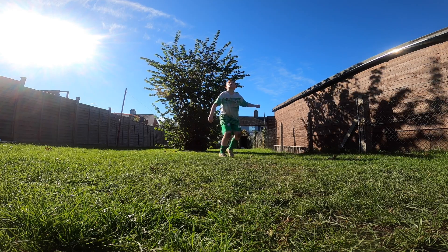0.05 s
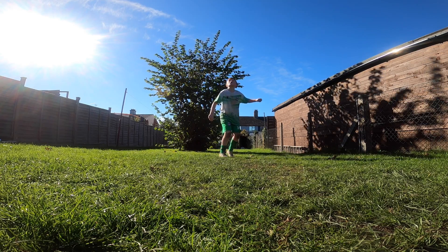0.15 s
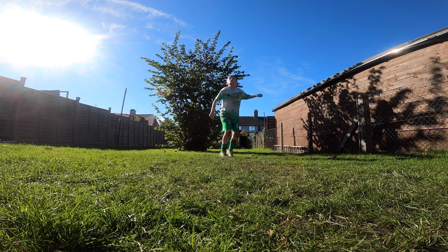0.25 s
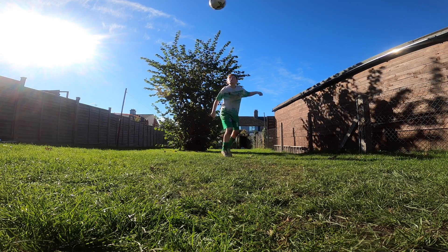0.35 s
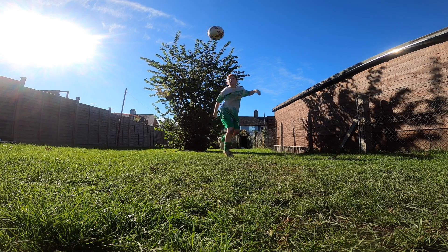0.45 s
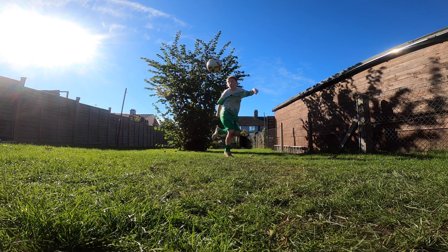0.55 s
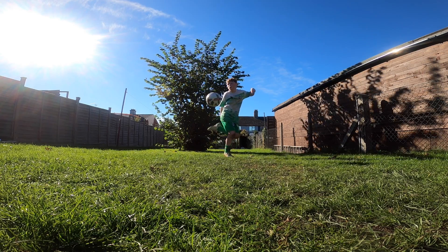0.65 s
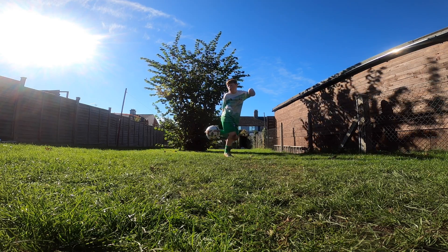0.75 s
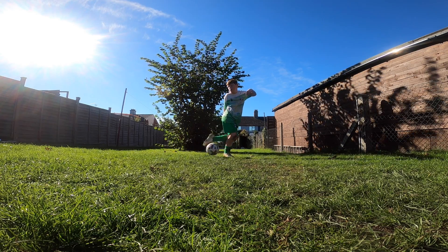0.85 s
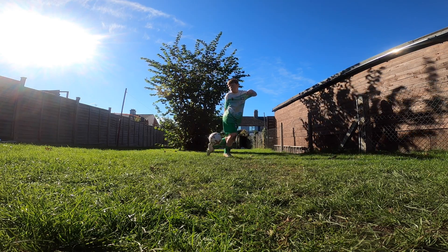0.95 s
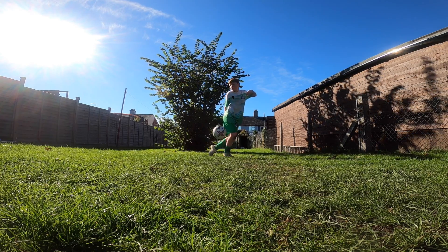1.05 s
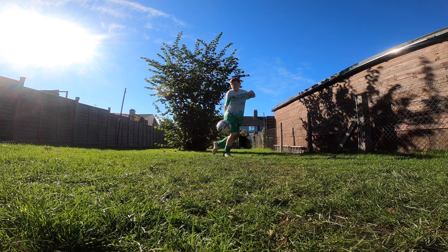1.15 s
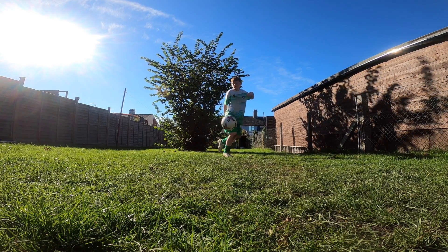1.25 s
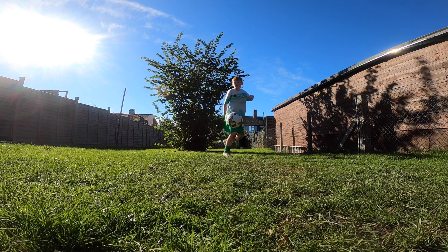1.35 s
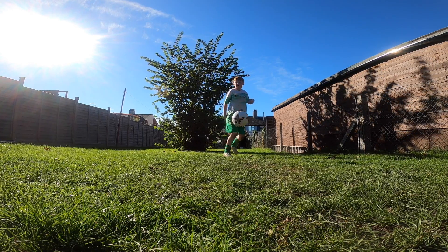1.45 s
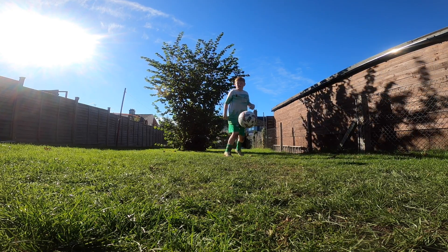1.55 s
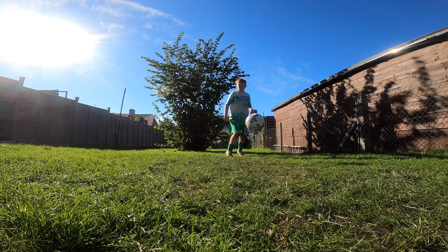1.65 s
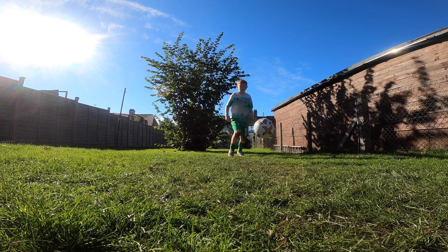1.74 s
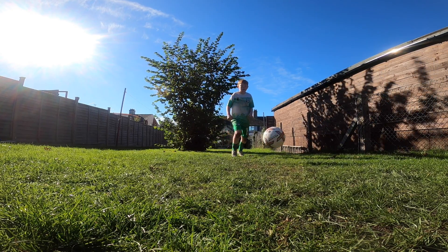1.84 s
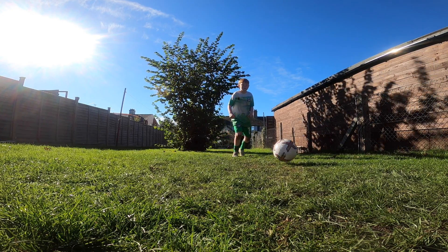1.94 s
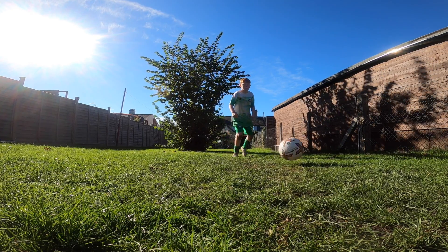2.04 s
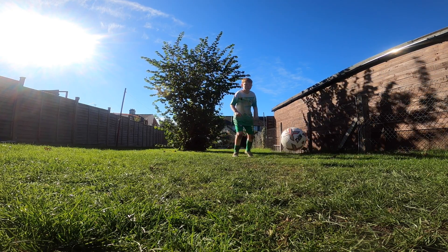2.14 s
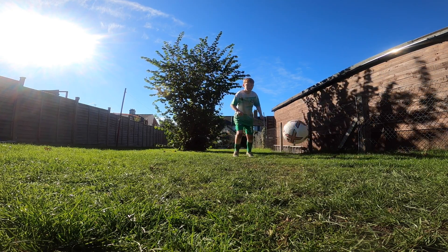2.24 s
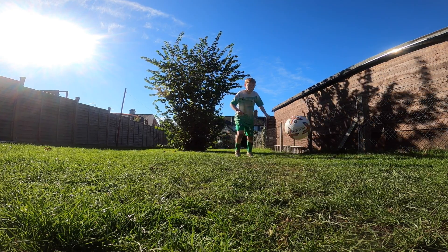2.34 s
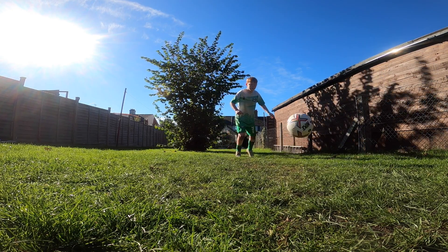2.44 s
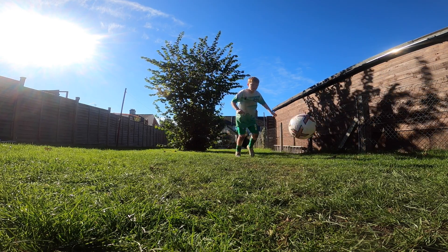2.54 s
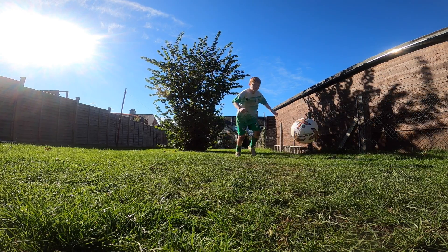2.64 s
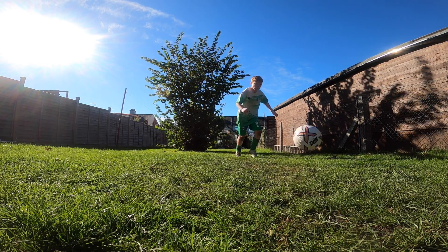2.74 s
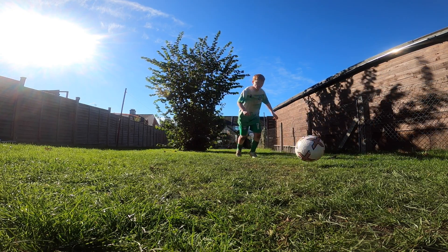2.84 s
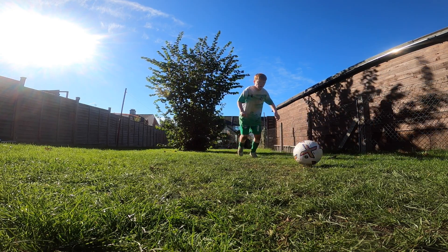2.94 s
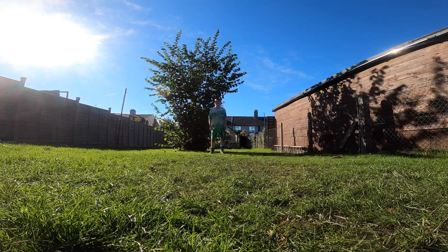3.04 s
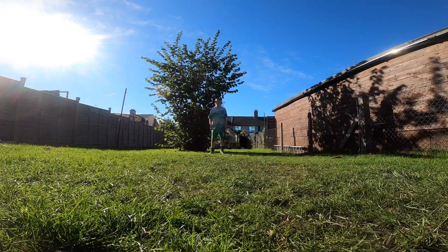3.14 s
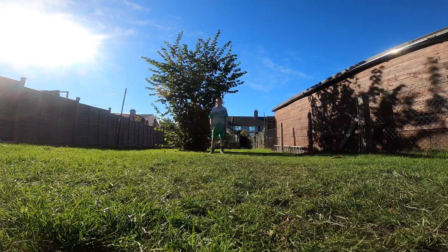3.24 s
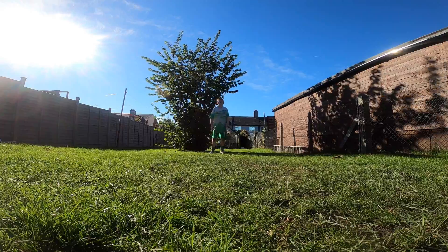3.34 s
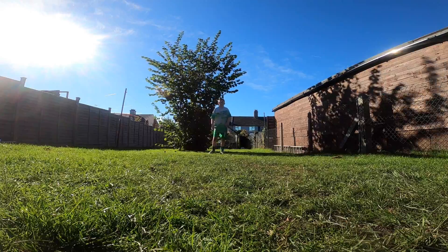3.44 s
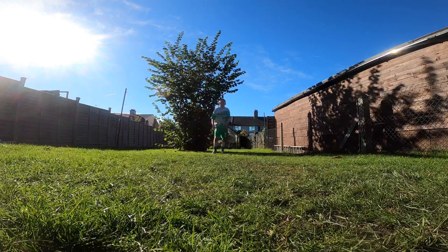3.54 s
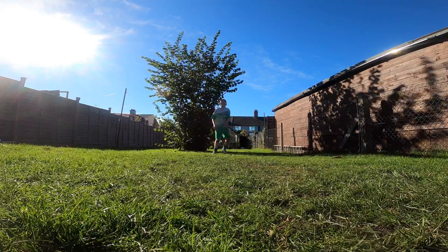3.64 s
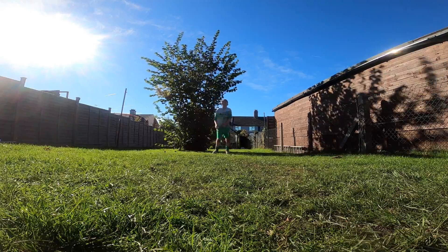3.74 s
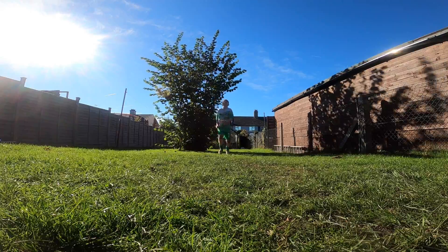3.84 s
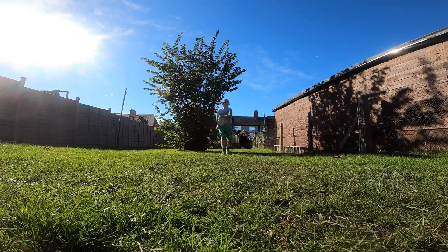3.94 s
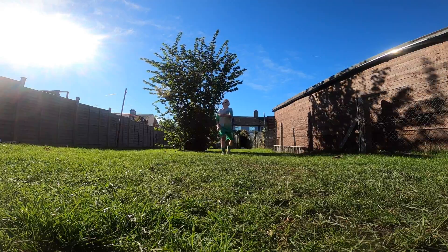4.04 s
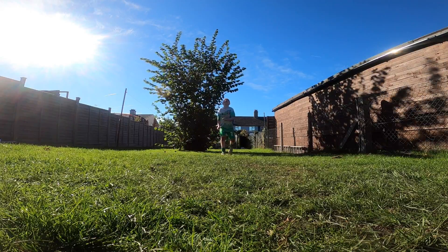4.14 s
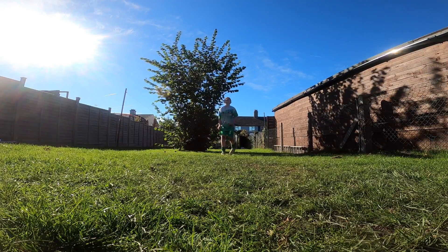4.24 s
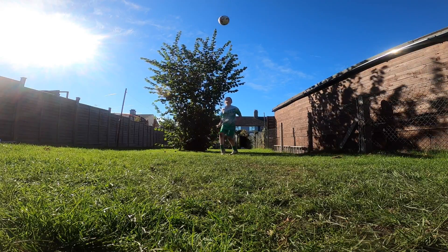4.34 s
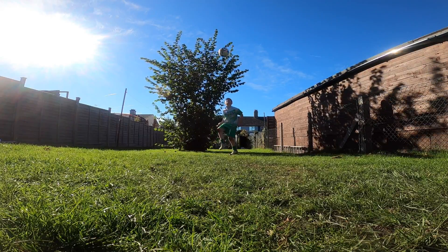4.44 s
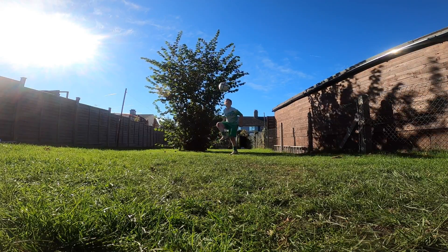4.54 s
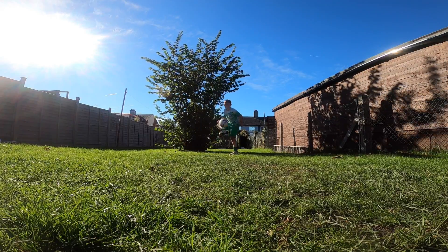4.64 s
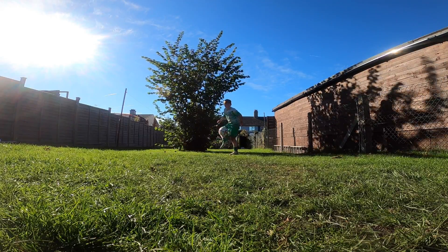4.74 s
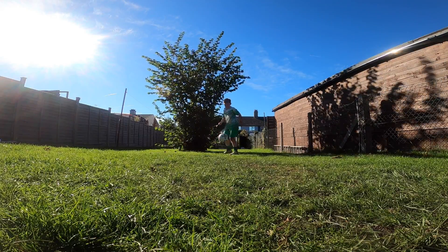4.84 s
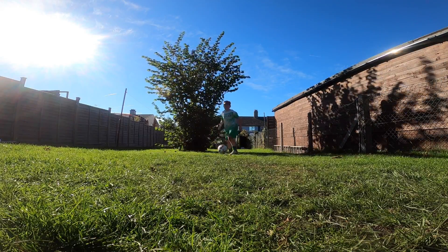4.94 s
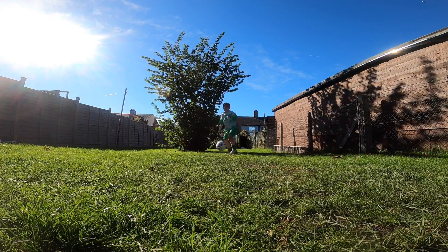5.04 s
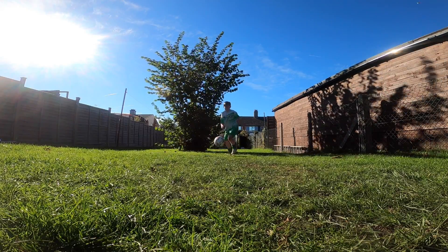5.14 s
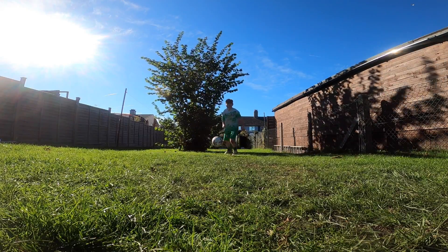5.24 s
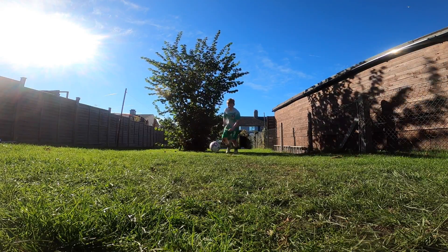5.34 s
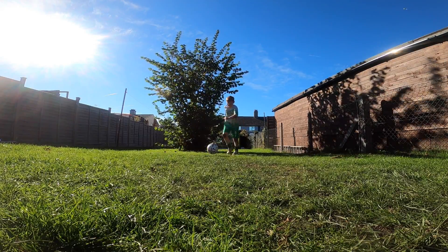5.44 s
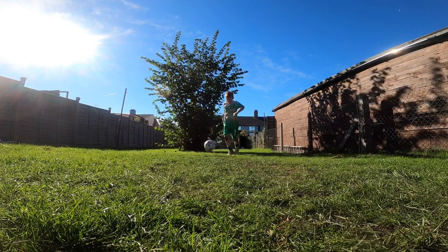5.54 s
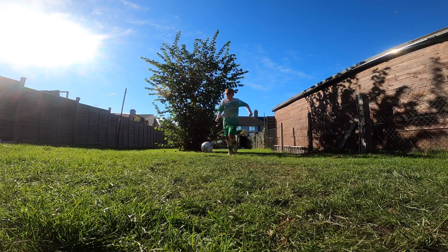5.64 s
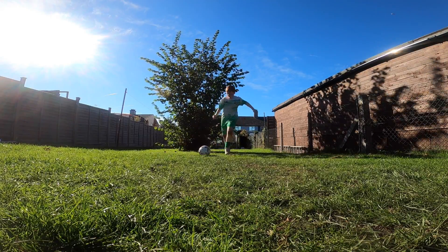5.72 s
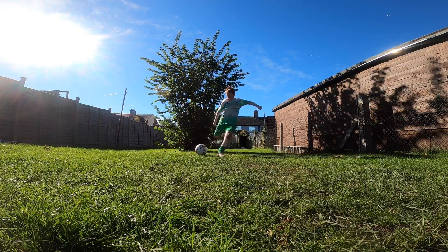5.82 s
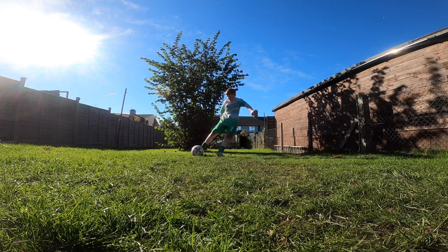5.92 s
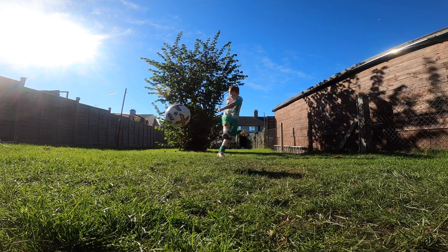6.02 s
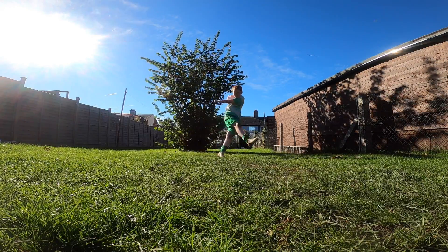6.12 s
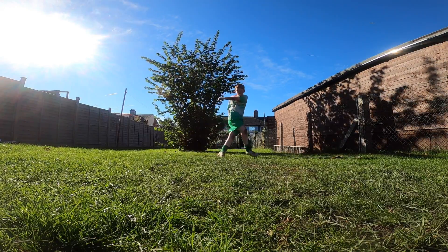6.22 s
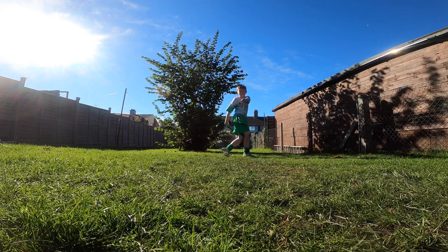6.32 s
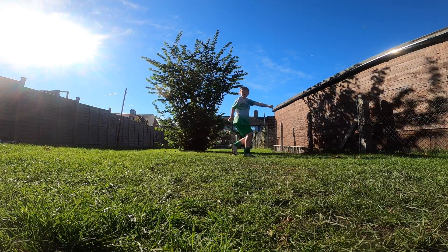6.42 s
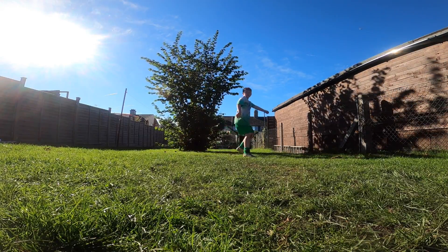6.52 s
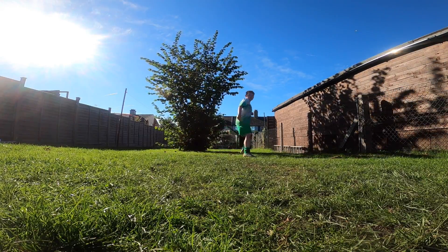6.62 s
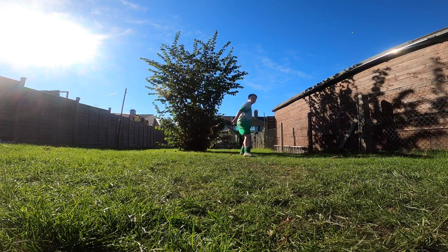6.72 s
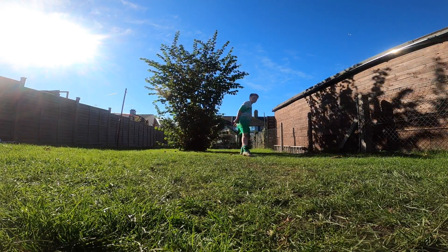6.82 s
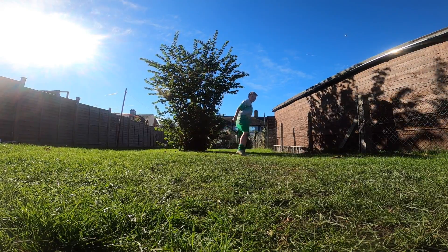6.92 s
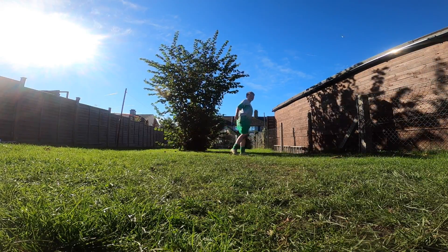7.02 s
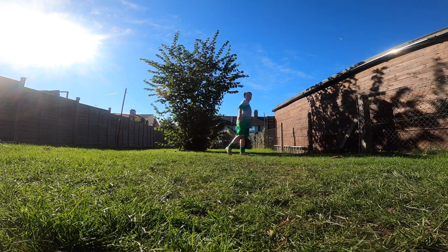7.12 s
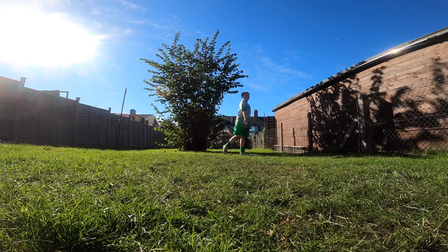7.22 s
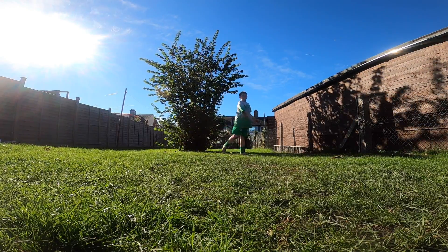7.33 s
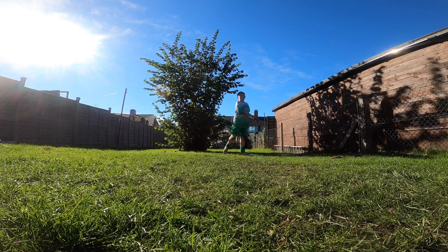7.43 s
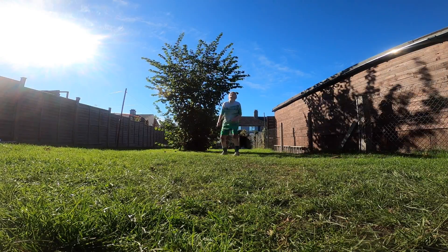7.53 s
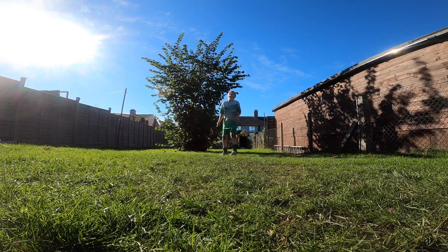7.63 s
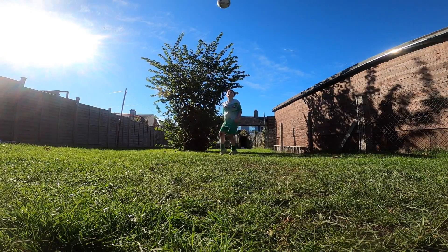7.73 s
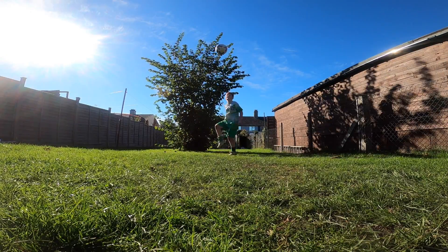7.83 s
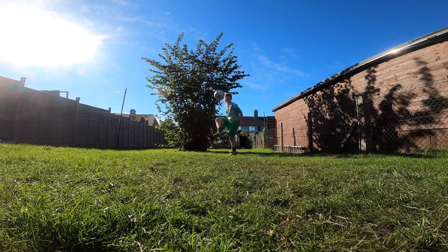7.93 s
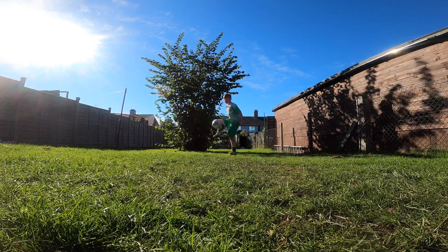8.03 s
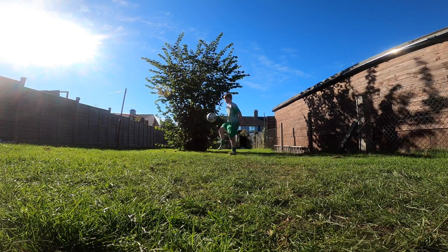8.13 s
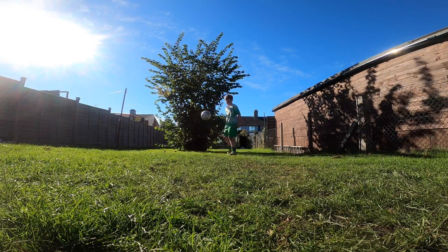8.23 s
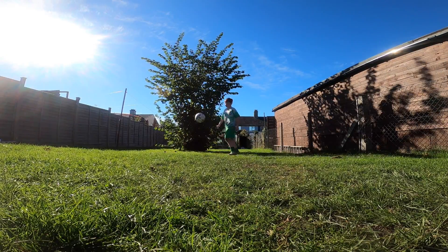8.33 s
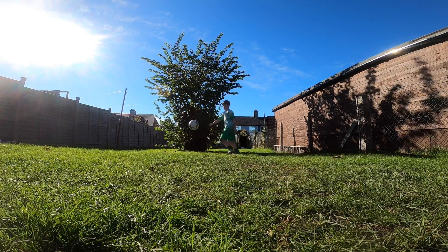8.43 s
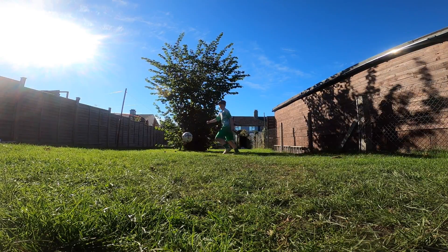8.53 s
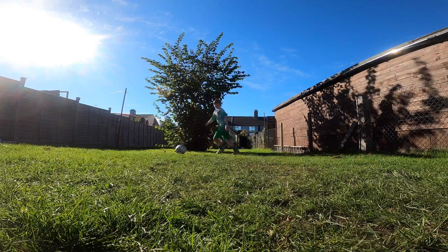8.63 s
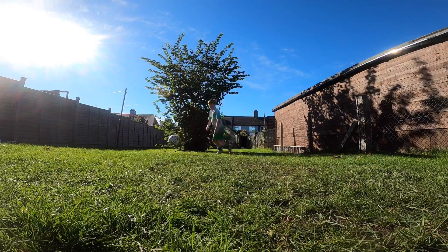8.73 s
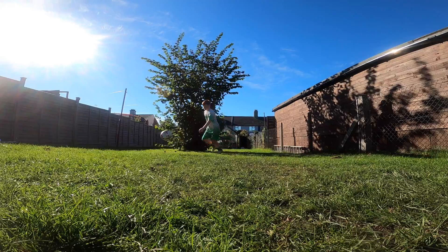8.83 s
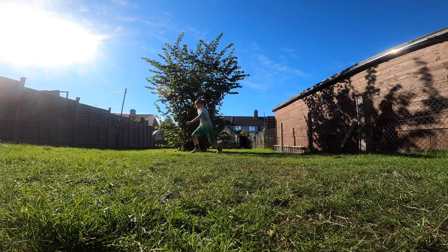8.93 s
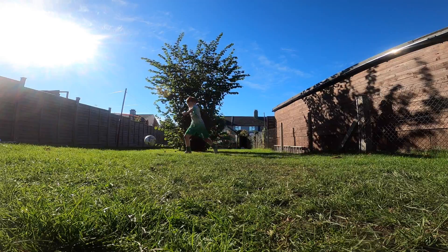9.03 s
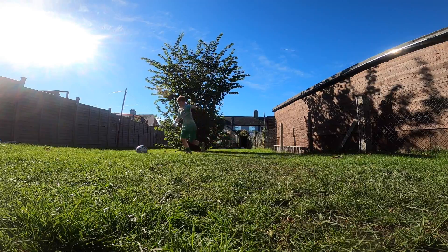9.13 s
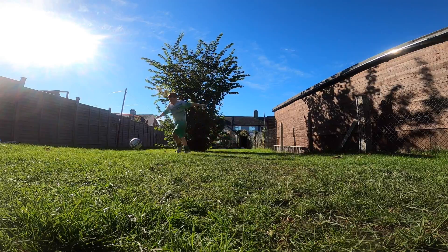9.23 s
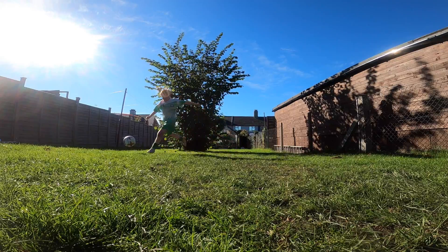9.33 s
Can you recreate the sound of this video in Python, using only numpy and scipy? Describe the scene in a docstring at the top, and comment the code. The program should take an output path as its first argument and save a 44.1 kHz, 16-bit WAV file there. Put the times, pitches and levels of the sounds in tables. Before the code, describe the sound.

A back garden with far traffic, light breeze and hissing leaves. Until about 3.1 s everything is in slow motion, low and stretched: a shoe scuff and strong booming double blow on a football at 1.0 s, then a duller thud with grass crunch at 2.2 s. The sound switches abruptly to normal speed, with uneven wind rumble and thin, faint bird notes around 3.2 to 4.3 s. Soft footfalls thump the turf near 3.6 s. A sharp, bright kick lands at 4.8 s, with a gust buffeting the microphone until 5.4 s. Steps lead to the loudest, hard smack at 6.05 s, with short garden echoes and faint chirps; at 6.6 s the ball hits the fence and a loose board rattles briefly. Quieter steps follow, another crisp slap at 8.1 s, then weaker, dull touches at 8.7 and 9.25 s, over subdued wind and leaves.

```python
"""A football is kicked and bounced on a back-garden lawn, with the first three seconds in slow motion.
It opens on far traffic, hissing leaves and a light breeze, all as shaped noise; then shoes scuff and thump
the grass, and each blow on the ball adds a slap, a low thud and garden echoes, made of dying sine waves.
At full speed the wind grows lumpy and a few far birds sing wavering notes; near five seconds a gust
thuds on the microphone, and after a later kick a struck fence board rattles."""
import sys
import numpy as np
from scipy import signal
from scipy.fft import rfft, irfft, next_fast_len
from scipy.io import wavfile

SR = 44100
rng = np.random.default_rng(int(sys.argv[2]) if len(sys.argv) > 2 else 0)


def inscribe(sig):
    """Save sig as 16-bit PCM at rate SR to the path in sys.argv[1].

    A 1-D sig is mono; a 2-D sig holds one channel per row.
    Samples are clipped to [-1, 1] before scaling.
    """
    pcm = np.round(np.clip(np.atleast_2d(sig).T, -1, 1) * 32767)
    wavfile.write(sys.argv[1], SR, pcm.astype(np.int16))


N = 413216
SLOW_UNTIL_S, SLOW_SPEED = 3.07, .5   # slow motion ends here; half speed
CUTOFF_HZ = 15500   # top of the shaped noises, before any slowing
TIME = np.arange(N) / SR   # seconds through the whole sound
AGE = np.arange(int(.6 * SR)) / SR   # seconds through one short sound
LEAD_S = .1   # a brush or lump peaks this far into its own sound, before any slowing


def from_db(db):
    """Turn decibels into a plain multiplier."""
    return 10 ** (np.asarray(db) / 20)


def rms_one(x):
    """Scale a sound to an average strength (rms) of 1."""
    return x / np.sqrt(np.mean(x ** 2) + 1e-20)


def in_time(rows):
    """Read each column of a curve at every sample."""
    s, *columns = np.transpose(rows)
    return [np.interp(TIME, s, column) for column in columns]


def at_hz(points, hz):
    """Read a curve over pitch, with straight lines on a log-frequency axis."""
    point_hz, values = np.transpose(points)
    return np.interp(np.log(hz + 1e-9), np.log(point_hz), values)


def band(x, low_hz, high_hz, order=2):
    """Keep only the pitches between two limits."""
    limits = [low_hz, min(high_hz, SR / 2 - 100)]
    return signal.sosfilt(signal.butter(order, limits, "band", fs=SR, output="sos"), x + 1e-18)


def stereo_noise(size, side_db):
    """White noise, partly unlike in the two ears."""
    mid, side = rng.standard_normal((2, size))
    return mid + from_db(side_db) * side * [[1], [-1]]


def coloured(spectrum, size, side_db, speed=1):
    """Stereo noise of a given spectrum, its middle at rms 1; a lower speed lowers its pitch."""
    padded = next_fast_len(size)
    hz = np.arange(padded // 2 + 1) * SR / padded / speed
    gain = from_db(at_hz(spectrum, hz)) * (hz < CUTOFF_HZ)
    noise = irfft(rfft(stereo_noise(padded, side_db)) * gain, padded)[:, :size]
    return noise / np.std(noise.mean(axis=0))


def drift(rate):
    """Random wander: lines between chance values of spread 1, rate of them per second."""
    knots = rng.standard_normal(int(rate * N / SR) + 2)
    return np.interp(TIME * rate, np.arange(len(knots)), knots)


def short_drift(rate):
    """The same wander, as long as one short sound."""
    return drift(rate)[:len(AGE)]


def pan(left_db):
    """Make the left louder than the right by left_db, shared between the two."""
    return from_db([[left_db / 2], [-left_db / 2]])


def ring(hz, t60):
    """One struck mode: a sine that falls by 60 dB in t60 seconds."""
    return np.sin(2 * np.pi * hz * AGE) * from_db(-60 * AGE / t60)


def delayed(sound, s):
    """The same sound, s seconds later."""
    return np.interp(AGE - s, AGE, sound, left=0)


def add(out, s, sound, lead=0):
    """Place a sound whose moment lies lead seconds in; slow motion stretches it and drops it an octave."""
    if s < SLOW_UNTIL_S:
        sound = signal.resample_poly(sound, round(1 / SLOW_SPEED), 1, axis=-1)
        lead = lead / SLOW_SPEED
    start = min(round((s - lead) * SR), N)
    out[:, start:start + sound.shape[-1]] += sound[..., :N - start]


def brush(length, hz):
    """Blades or leaves are stirred: grainy noise that swells quickly and settles more slowly."""
    grains = stereo_noise(len(AGE), side_db=-8) * from_db(4.8 * short_drift(900))
    sound = band(grains, hz * .6, hz * 1.3, order=3)
    sound = sound + from_db(-4) * band(grains, hz * .15, hz * 1.34)
    since = AGE - LEAD_S
    side_length = length * np.where(since < 0, .65, 1.2)
    return rms_one(sound) * np.exp(-np.abs(since / side_length) ** 0.79)


def lump(hz):
    """One smooth lump of pressure, with a shallow dip on either side."""
    phase = (np.pi * hz * (AGE - LEAD_S)) ** 2
    return (1 - 2 * phase) * np.exp(-phase)


# Colour of the wind before its speed shifts it. Each row: pitch in Hz, relative strength in dB.
WIND_COLOUR = [(15, 2), (35, 3.5), (65, 1.5), (120, -9.5), (200, -19.5), (320, -35), (700, -49),
               (2000, -84)]


def wind(level_db, speed, side_db, left_db):
    """Moving air makes low, lumpy noise on the microphone ports."""
    lumpy_db = level_db + 4.4 * drift(22 * speed)
    return from_db(lumpy_db) * coloured(WIND_COLOUR, N, side_db, speed) * pan(left_db)


# Colour of the traffic before its speed shifts it. Each row: pitch in Hz, relative strength in dB.
TRAFFIC_COLOUR = [(30, 17), (120, 17.5), (300, 8.5), (480, 2.5), (720, -3), (1050, 2), (1400, 2),
                  (1900, -8.5), (3000, -41), (9000, -51)]


def traffic(level_db, speed):
    """Far traffic is a dull, gently wandering noise."""
    wandering_db = level_db + 2.5 * drift(12 * speed)
    return from_db(wandering_db) * coloured(TRAFFIC_COLOUR, N, side_db=-9.5, speed=speed)


# Colour of the leaves before their speed shifts it. Each row: pitch in Hz, relative strength in dB.
LEAVES_COLOUR = [(600, -28), (2000, -4), (3100, 1), (5000, -3), (6800, -7), (8000, -13.5), (10000, -19.5),
                 (12000, -27.5), (16000, -41.5)]


def leaves(level_db, speed):
    """A bush hisses: bright noise that flutters a little."""
    fluttering_db = level_db + 1.87 * drift(40 * speed)
    return from_db(fluttering_db) * coloured(LEAVES_COLOUR, N, side_db=-3, speed=speed)


# Surroundings in slow motion. Each row: time in seconds, then traffic and leaves in dB before gain.
SLOW_AIR = [(0.0, -63, -66), (1.11, -62.5, -65), (1.38, -69, -70.5), (1.75, -65.5, -70.5),
            (2.42, -62, -62.5), (3.05, -65.5, -65)]


def slow_surroundings():
    """Traffic, leaves and a light, even breeze, slowed to half speed and so an octave lower."""
    traffic_db, leaves_db = in_time(SLOW_AIR)
    breeze = wind(-48.5, SLOW_SPEED, side_db=-12, left_db=-1.0)
    return breeze + traffic(traffic_db + 10.5, SLOW_SPEED) + leaves(leaves_db + 0.2, SLOW_SPEED)


# Shoes and ball touching the lawn; before 3.07 s slow motion doubles lengths and halves pitches.
# Each row: time in seconds, scuff in dB, scuff length in seconds, scuff centre in Hz,
# thump in dB before panning.
STEPS = [(0.997, -53, .002, 1390, -43), (1.020, -24.5, 0.0013, 3180, -35), (1.731, -61.5, 0.03, 2500, -49),
         (2.059, -53, 0.0055, 1800, -56), (2.179, -38, 0.0061, 4740, -38), (2.26, -58, 0.023, 4960, -52),
         (2.356, -58.5, 0.067, 2020, -39), (2.592, -51, 0.021, 1880, -46), (2.971, -42, 0.0018, 1570, -54),
         (3.24, -54.5, 0.015, 1250, -38), (3.607, -56.5, 0.026, 4400, -23.5),
         (3.81, -54, 0.0032, 1850, -34), (4.051, -53, 0.012, 1700, -33.5),
         (5.089, -44.5, 0.0067, 1340, -16), (5.807, -55.5, 0.017, 1700, -22.5),
         (5.939, -44, 0.0065, 1790, -22.5), (6.056, -29.5, 0.0032, 2000, -20),
         (6.372, -54, 0.021, 1550, -24.5), (6.728, -52.5, 0.011, 3000, -42),
         (6.907, -54, 0.0066, 1400, -30), (7.547, -45, 0.0024, 4200, -33), (7.793, -46, .0025, 1750, -35.5),
         (7.816, -42, .013, 1670, -35.5), (8.078, -54.5, 0.017, 1990, -55),
         (8.324, -51, 0.003, 1300, -36.5), (8.525, -54.5, 0.016, 1660, -67),
         (8.574, -52.5, .012, 1490, -48), (9.36, -51.5, 0.056, 6090, -51)]


def footwork():
    """Each touch scuffs the grass, then its weight thumps the turf just after."""
    thump_delay_s, thump_hz = 0.0038, 74.4   # at full speed
    out = np.zeros((2, N))
    for s, scuff_db, length, hz, thump_db in STEPS:
        add(out, s, from_db(scuff_db) * brush(length, hz), LEAD_S)
        thump = from_db(thump_db) * lump(thump_hz) * pan(left_db=9.5)
        add(out, s, thump, LEAD_S - thump_delay_s)
    return out


# Higher modes of the shell, at full speed.
# Each row: pitch in Hz, level in dB before the blow's own shell and thud levels, t60 in seconds.
SHELL = [(161.6, -17.5, 0.21), (259, -21.5, 0.096), (340, -22, 0.077), (448, -24, 0.053)]


def thud(hz, t60, shell_db):
    """The squashed ball swells back and wobbles in its shell modes."""
    shell = sum(from_db(db + shell_db) * ring(mode_hz, decay) for mode_hz, db, decay in SHELL)
    swell = 1 - np.exp(-(AGE / 0.0029) ** 2)
    return -(ring(hz, t60) + shell) * swell


# The air inside the ball, at full speed.
# Each row: pitch in Hz, level in dB before the blow's slap level, t60 in seconds.
CAVITY = [(1050, -18, 0.039), (1186, -26.5, 0.1), (1810, -38.5, 0.031), (2000, -40.5, 0.019)]


def slap(hz, t60):
    """The ball smacks the shoe for a few cycles and the air inside it pings."""
    cavity = sum(from_db(db) * ring(mode_hz, decay) for mode_hz, db, decay in CAVITY)
    return -band(1.53 * ring(hz, t60) + cavity, 250, 2800, order=3)


# The stiff skin under a hard shoe, at full speed.
# Each row: pitch in Hz, level in dB before the blow's crack level, t60 in seconds.
SKIN = [(3230, -4.5, 0.0037), (4490, 7, 0.0021), (5600, 4, 0.0025), (6310, 1.5, 0.0028), (8190, -9, .003),
        (9720, -19.5, 0.0074), (14000, -32.5, 0.0013)]


def crack():
    """The skin snaps flat in a very short, bright burst of modes with alternating signs."""
    burst = 0
    for k, (hz, db, t60) in enumerate(SKIN):
        burst = burst + (-1) ** k * from_db(db) * ring(hz, t60)
    return band(burst, 3670, 17000, order=3)


def recoil(sound, delay_s):
    """The skin springs back just after the contact and repeats its pulse upside down."""
    return sound - from_db(-8.0) * delayed(sound, delay_s)


# Distinct echoes from nearby surfaces, at full speed.
# Each row: delay in seconds, level in dB before the echo trim.
REFLECTIONS = [(0.0088, -20.5), (0.0123, -15.5), (.037, -22), (.072, -38)]
# Strength of the garden's scatter. Each row: pitch in Hz, level in dB before trims.
ECHO = [(30, -29), (70, -30), (150, -29.5), (300, -22), (700, -22.5), (1300, -29.5), (2700, -36.5),
        (5000, -35), (9000, -22), (16000, -33.5)]
# How fast the scatter dies, at full speed. Each row: pitch in Hz, t60 in seconds.
ECHO_T60 = [(60, 0.77), (200, 0.43), (500, 0.31), (1500, 0.057), (5000, 0.52), (12000, 0.03)]


def garden(sound, crisp):
    """Fence, wall and bush return distinct echoes of the crisp part and a scatter that dies band by band."""
    response = 0
    for low in 25 * 2 ** np.arange(10):   # octave bands
        high = low * 2
        hz = np.sqrt(low * high)
        scatter = band(stereo_noise(len(AGE), side_db=-18), low, high)
        response = response + scatter * from_db(at_hz(ECHO, hz) - 8.5 - 60 * AGE / at_hz(ECHO_T60, hz))
    build_up = 1 - np.exp(-(AGE / 0.0048) ** 2)
    response = response * build_up * from_db(2.3 * short_drift(308.5))
    echoes = sum(from_db(db) * delayed(crisp, delay) for delay, db in REFLECTIONS)
    scattered = signal.fftconvolve(sound[None], response, axes=1)[:, :len(AGE)]
    return echoes + from_db(-1.5) * scattered


# Blows on the ball; pitches, decays and delays are at full speed, levels are before trims and panning.
# Each row: time in seconds, thud in dB, thud pitch in Hz, thud t60 in seconds, shell in dB against the
# thud, knock in dB, slap in dB, slap pitch in Hz, slap t60 in seconds, recoil delay in seconds,
# crack in dB, crushed grass in dB.
KICKS = [(1.0180, -4.5, 90, 0.11, 10, -10, -10, 1395, 0.0045, 0.00035, -35, -30),
         (1.0690, -14.5, 120.8, 0.25, 10, -20, -16, 1640, 0.0057, 0.00058, -25, -30),
         (2.1744, -9, 78.3, .051, -13, -38, -24, 1390, 0.012, 0.00137, -43, -20.5),
         (4.7815, -4, 112, 0.092, 4, -8, -13.5, 1480, 0.0075, 0.0014, -12, -33),
         (6.0476, 2, 119, 0.045, 0.5, -22, -5.5, 1170, 0.0046, .0013, -30.5, -21.5),
         (6.6260, -5.5, 114, 0.048, -13, -31, -13.5, 920, 0.004, .0015, -31, -36),
         (8.1236, -5, 112.5, 0.13, -6, -25, -9, 1320, 0.0059, 0.00111, -11.5, -43),
         (8.735, -10.5, 85, 0.087, -4, -45, -33, 1245, .01, 0.0013, -49, -52.5),
         (9.2517, -20, 94.4, 0.11, -11, -51, -44, 1170, 0.022, 0.0014, -51, -50)]
# Colour of the swish in the grass at full speed. Each row: pitch in Hz, relative strength in dB.
SWISH = [(200, -13.5), (600, 13.5), (1300, 13), (2400, 2), (5000, -12.5), (7000, -17), (10000, -33),
         (16000, -50.5)]


def ball():
    """Every blow with its echoes; grass swishes around the contact, is crushed and springs back."""
    # delays, lengths and pitches at full speed; the two levels are in dB against the slap
    crush_delay_s, crush_s, crush_hz = .004, 0.0039, 1330
    settle_delay_s, settle_s, settle_hz, settle_db = .034, 0.024, 3100, -35.5
    bush_delay_s, bush_spread_s, bush_hz, bush_db = 0.057, 0.025, 1395, -36
    out, swish_lead_s = np.zeros((2, N)), .03
    swish_shape = np.exp(np.minimum((AGE - swish_lead_s) / 0.0032, (swish_lead_s - AGE) / 0.015))
    for (s, thud_db, thud_hz, thud_t60, shell_db, knock_db, slap_db, slap_hz, slap_t60,
         recoil_s, crack_db, grass_db) in KICKS:
        body = from_db(thud_db) * thud(thud_hz, thud_t60, shell_db)
        knock = from_db(knock_db) * band(ring(hz=400, t60=0.0023), 200, 900)
        skin = from_db(slap_db) * slap(slap_hz, slap_t60) + from_db(crack_db + 1.5) * crack()
        crisp = knock + recoil(skin, recoil_s)
        blow = body + crisp
        add(out, s, blow + from_db(-3.0) * garden(blow, crisp))

        swish = swish_shape * coloured(SWISH, len(AGE), side_db=-5.5)
        add(out, s, from_db(slap_db - 21.5) * swish, swish_lead_s)
        crushed = from_db(grass_db) * brush(crush_s, crush_hz)
        add(out, s, crushed, LEAD_S - crush_delay_s)
        settling = from_db(slap_db + settle_db) * brush(settle_s, settle_hz)
        add(out, s, settling, LEAD_S - settle_delay_s)
        # the slap returns smeared from the bush
        smeared = from_db(slap_db + bush_db) * brush(bush_spread_s, bush_hz)
        add(out, s, smeared, LEAD_S - bush_delay_s)
    return out * pan(left_db=-0.65)


# Wind on the microphone. Each row: time in seconds, level in dB before gain and panning.
WIND = [(3.14, -34), (3.28, -42.5), (3.61, -41.5), (3.78, -43.5), (4.3, -55), (4.48, -39), (4.68, -42),
        (4.94, -31.5), (6.26, -37.5), (6.4, -41), (6.78, -44), (7.09, -54), (7.41, -53.5), (7.76, -41.5),
        (7.89, -46), (8.24, -46), (8.45, -51.5), (9.37, -47)]
# Surroundings at full speed. Each row: time in seconds, then traffic and leaves in dB before gain.
AIR = [(3.08, -66, -64.5), (3.25, -66, -65), (4.46, -63, -59), (5.22, -66.5, -62), (6.02, -59.5, -60.5),
       (6.37, -70, -67.5), (6.9, -63.5, -64.5), (7.3, -69, -64), (7.6, -63.5, -66.5), (8.02, -64.5, -66),
       (9.02, -66.5, -72.5), (9.37, -62, -66.5)]


def full_surroundings():
    """Changing wind, traffic and leaves, with their noise a touch lowered by a speed of 0.98."""
    speed = 0.98
    wind_db, = in_time(WIND)
    traffic_db, leaves_db = in_time(AIR)
    gusts = wind(wind_db + 2.5, speed, side_db=-5, left_db=4.0)
    return gusts + traffic(traffic_db + 11.5, speed) + leaves(leaves_db + 0.92, speed)


# Far bird notes. Each row: start in seconds, length in seconds, first pitch in Hz, last pitch in Hz,
# level in dB before its flicker, waver as a share of the pitch.
BIRDS = [(3.22, 0.13, 5510, 5420, -56, .014), (3.233, .17, 5930, 5900, -69, .003),
         (3.952, 0.21, 4070, 4230, -59, 0.077), (4.25, 0.21, 1525, 1487, -57, .06),
         (6.101, 0.12, 3430, 3350, -55, .0036), (6.125, 0.11, 2560, 2530, -62, .004),
         (6.11, 0.093, 4330, 4240, -65, .0035), (7.443, 0.132, 307, 279, -50.5, .15),
         (9.294, 0.05, 4410, 4350, -59, .001)]


def birds():
    """Thin wavering sine notes that bend towards their end."""
    out = np.zeros((2, N))
    for s, length, first_hz, last_hz, db, waver in BIRDS:
        part = np.minimum(AGE / length, 1)   # how much of the note has passed
        glide_hz = first_hz + (last_hz - first_hz) * part ** 2
        hz = glide_hz * (1 + waver * short_drift(500))
        swell = np.sqrt(4 * part * (1 - part)) * from_db(2.8 * short_drift(110))
        add(out, s, from_db(db) * swell * np.sin(2 * np.pi * np.cumsum(hz) / SR))
    return out


# The strongest eddies of the big gust.
# Each row: time in seconds, level in dB before panning, rate of the lump in Hz.
EDDIES = [(4.853, -21.5, 79.4), (4.911, -26, 156), (4.931, -20, 47.6), (4.962, -20.5, 88),
          (5.358, -22, 121), (5.407, -23, 78)]


def eddies():
    """A single whirl of air passes the ports as one lump of pressure, stronger on the left."""
    out = np.zeros((2, N))
    for s, db, hz in EDDIES:
        add(out, s, from_db(db) * lump(hz) * pan(left_db=16), LEAD_S)
    return out


# Rattles after the ball has struck the fence.
# Each row: time in seconds, level in dB before the levels of the board's modes.
RATTLES = [(6.627, -33), (6.648, -31.5), (6.724, -46), (6.73, -40.5), (6.762, -49), (6.842, -47)]
# The board. Each row: pitch in Hz, level in dB before chance variation, t60 in seconds.
BOARD = [(950, -1.5, 0.057), (1023, -8.5, 0.1), (1146, -8, 0.034), (1450, -20, 0.07)]


def fence():
    """A loose board knocks against its rail a few times, each mode struck a bit differently."""
    out = np.zeros((2, N))
    for s, db in RATTLES:
        for hz, mode_db, t60 in BOARD:
            add(out, s, from_db(db + mode_db + rng.normal(0, 4.0)) * ring(hz, t60))
    return out


def scene():
    """The slowed opening gives way to the garden at full speed, with every event laid on top."""
    at_full_speed = np.clip((TIME - SLOW_UNTIL_S) / 0.0094 + .5, 0, 1)
    surroundings = slow_surroundings() * (1 - at_full_speed) + full_surroundings() * at_full_speed
    return surroundings + footwork() + ball() + birds() + eddies() + fence()


# Balance of the two ports. Each row: pitch in Hz, left minus right in dB.
PORT_BALANCE = [(1500, 1), (4500, 1.5), (9000, 1), (14000, 1.5)]


def record(dry):
    """The left port hears a little later and louder; the deepest rumble and the top are cut."""
    lag_s, most_radians = .000052, 2.13   # lag in the bass; in the treble the phase gap levels off
    padded = next_fast_len(N + SR)
    hz = np.arange(padded // 2 + 1) * SR / padded
    behind = most_radians * np.tanh(2 * np.pi * hz * lag_s / most_radians)
    port = from_db(at_hz(PORT_BALANCE, hz)) * np.exp(-1j * behind)
    left = irfft(rfft(dry[0], padded) * port, padded)[:N]
    ports = signal.sosfilt(signal.butter(2, 16, "high", fs=SR, output="sos"), [left, dry[1]])
    return signal.sosfilt(signal.cheby2(12, 70, CUTOFF_HZ + 1500, fs=SR, output="sos"), ports)


dry = scene()
out = record(dry)
inscribe(out)
```